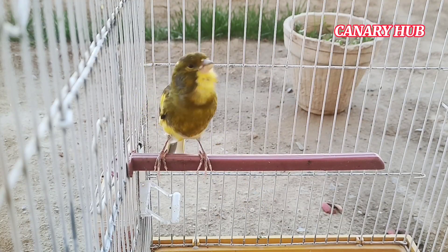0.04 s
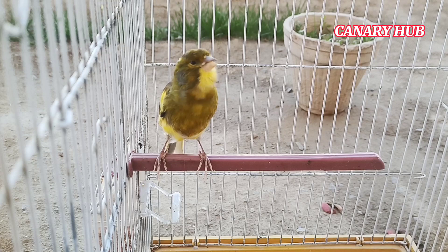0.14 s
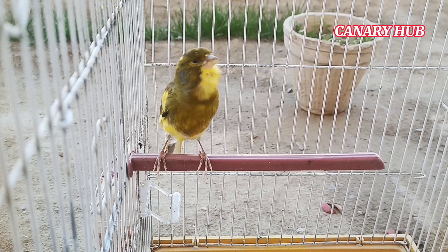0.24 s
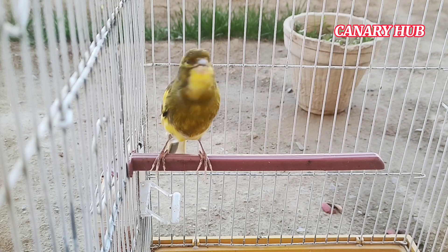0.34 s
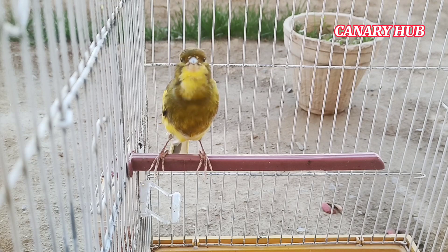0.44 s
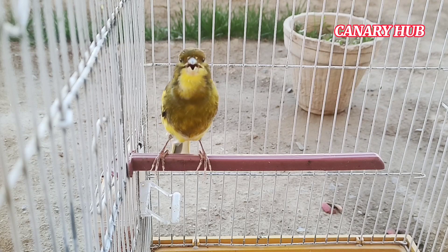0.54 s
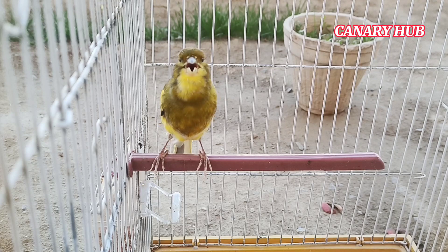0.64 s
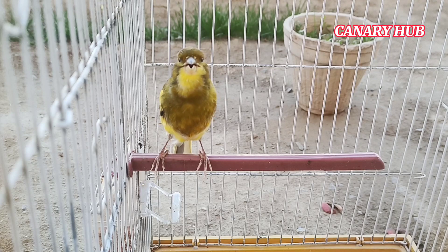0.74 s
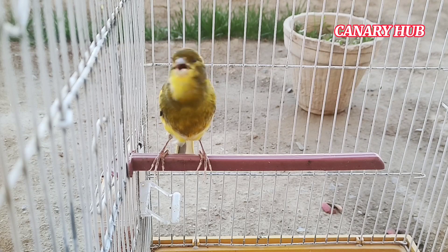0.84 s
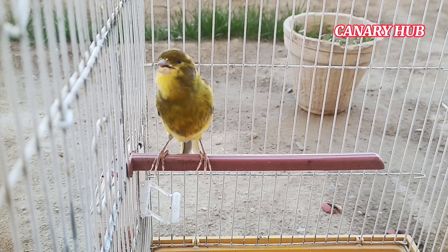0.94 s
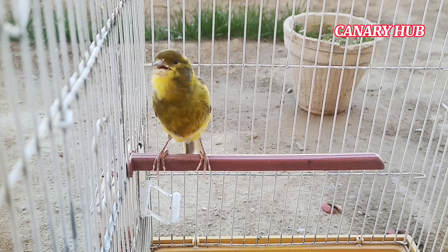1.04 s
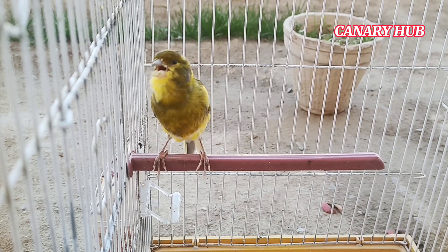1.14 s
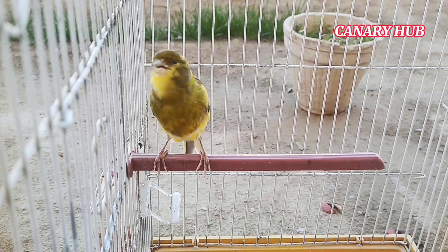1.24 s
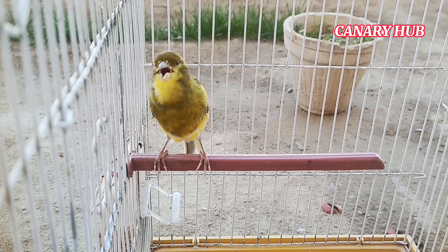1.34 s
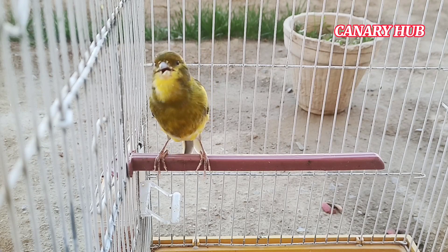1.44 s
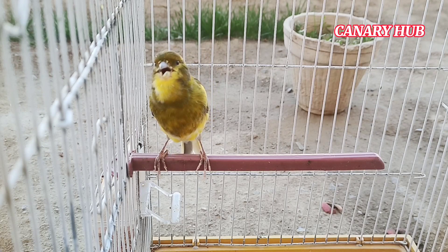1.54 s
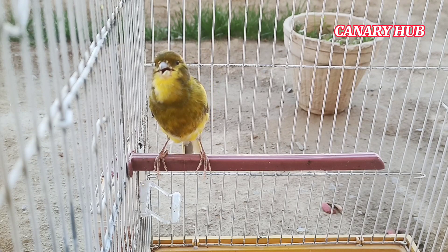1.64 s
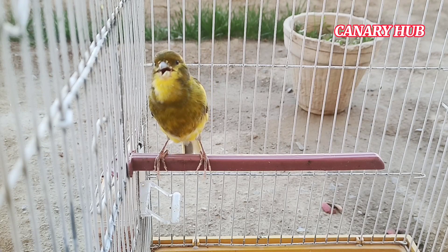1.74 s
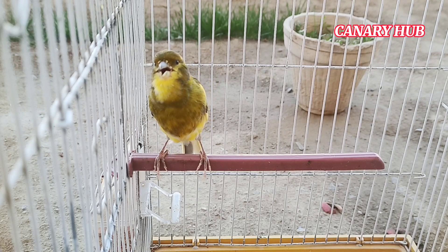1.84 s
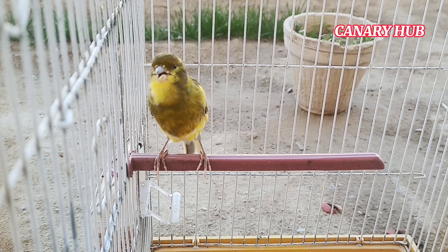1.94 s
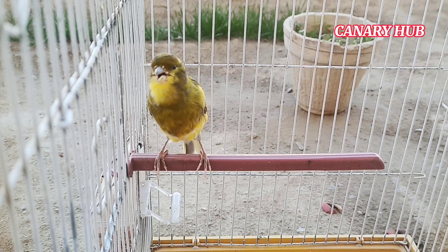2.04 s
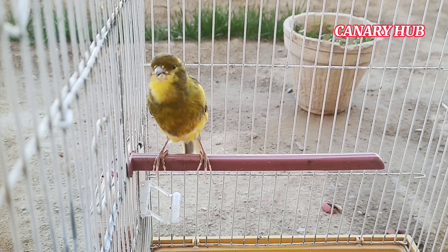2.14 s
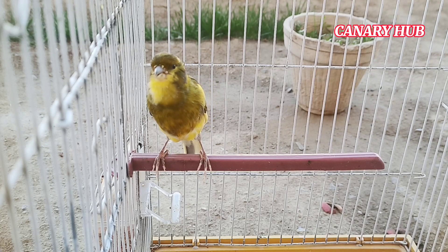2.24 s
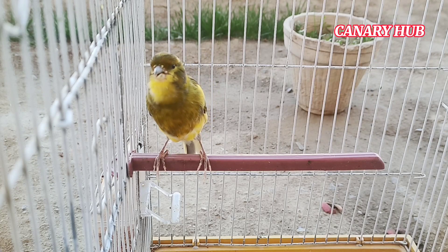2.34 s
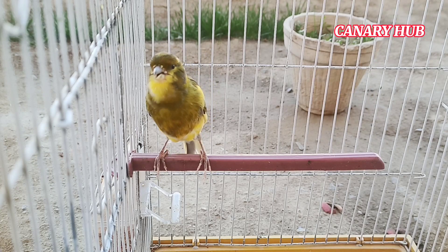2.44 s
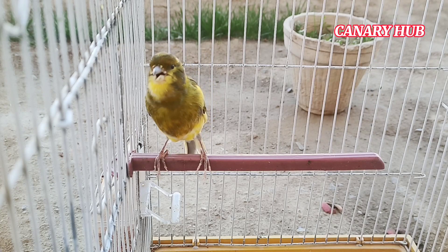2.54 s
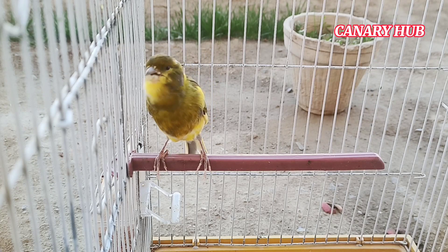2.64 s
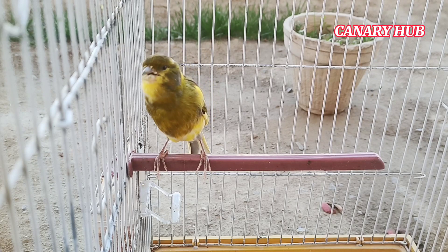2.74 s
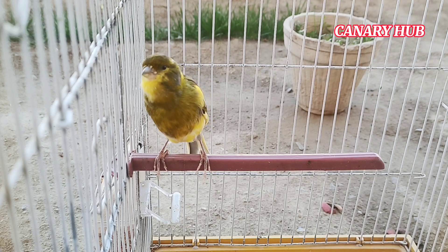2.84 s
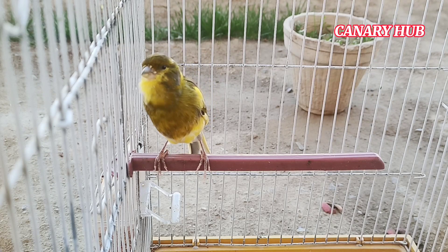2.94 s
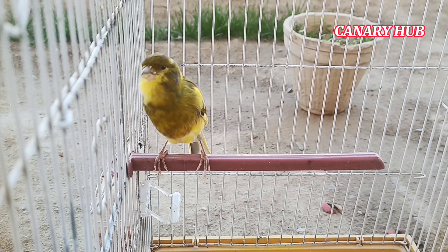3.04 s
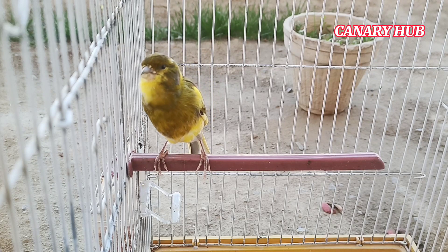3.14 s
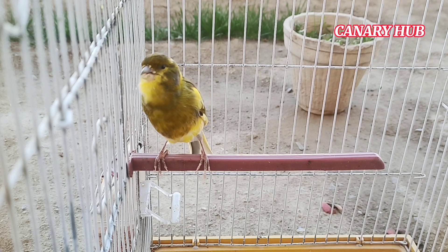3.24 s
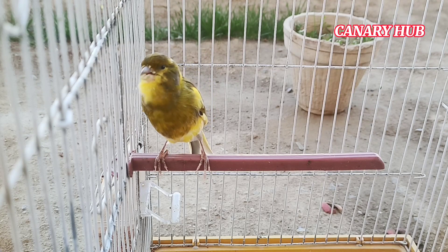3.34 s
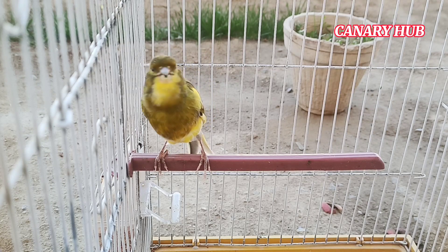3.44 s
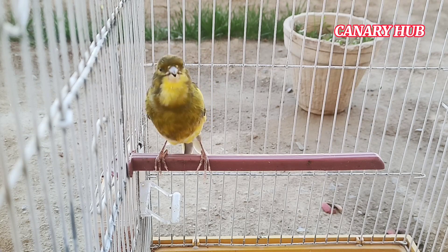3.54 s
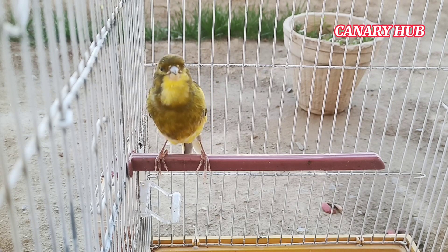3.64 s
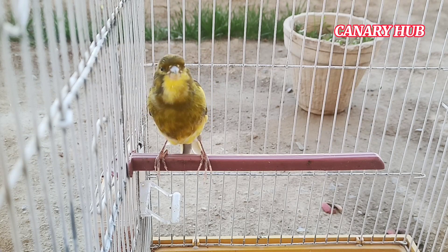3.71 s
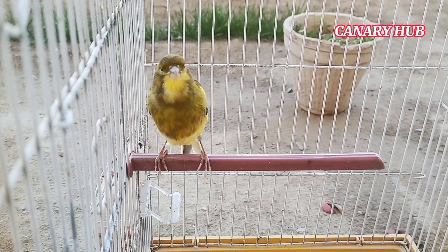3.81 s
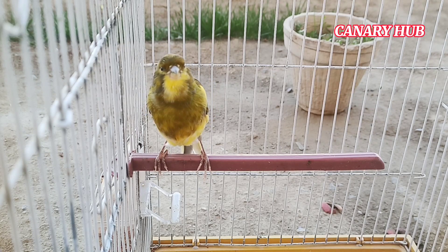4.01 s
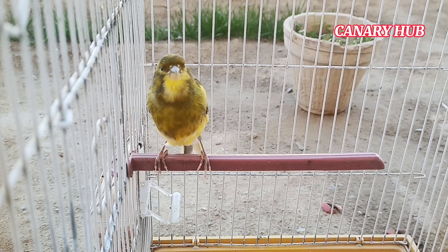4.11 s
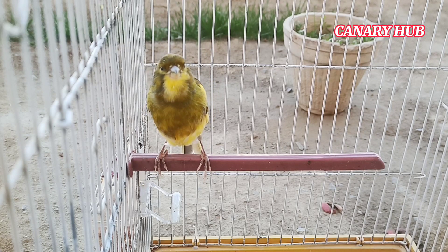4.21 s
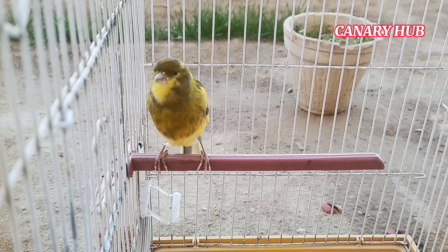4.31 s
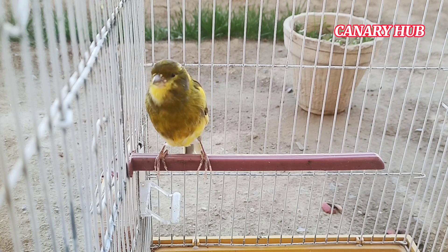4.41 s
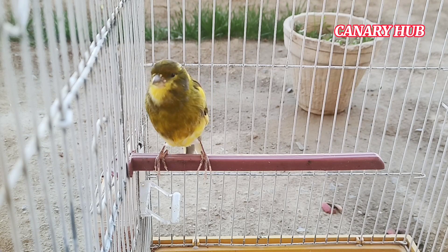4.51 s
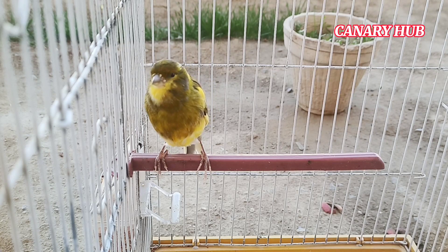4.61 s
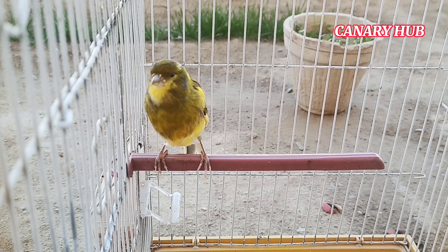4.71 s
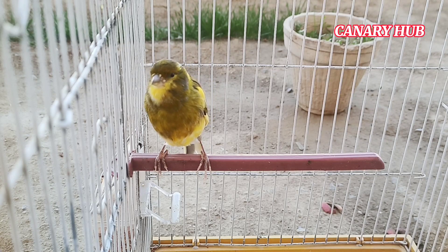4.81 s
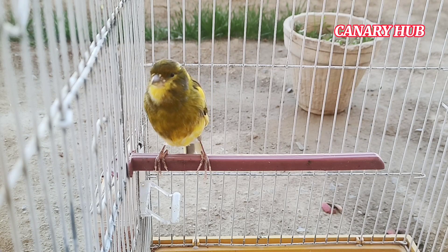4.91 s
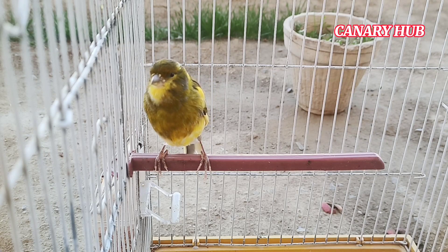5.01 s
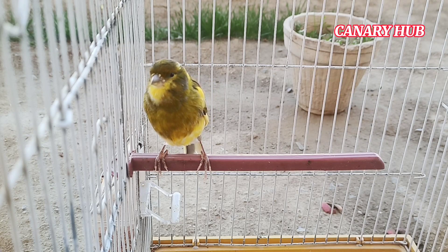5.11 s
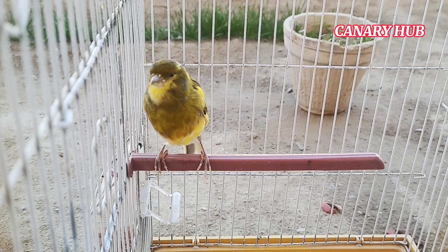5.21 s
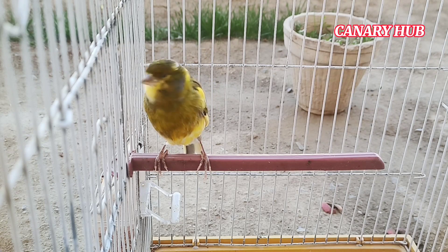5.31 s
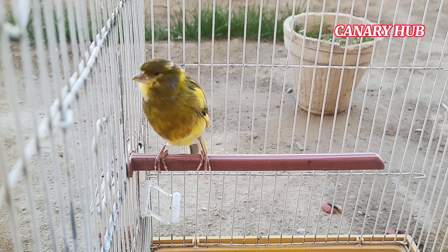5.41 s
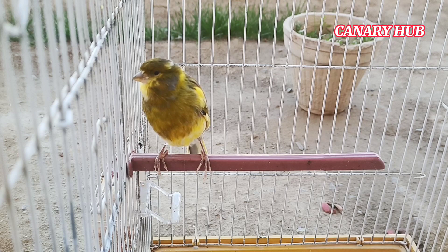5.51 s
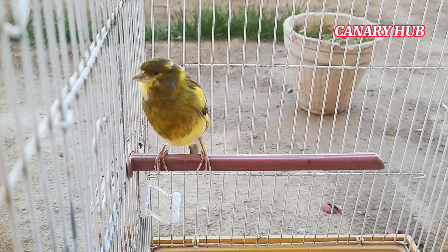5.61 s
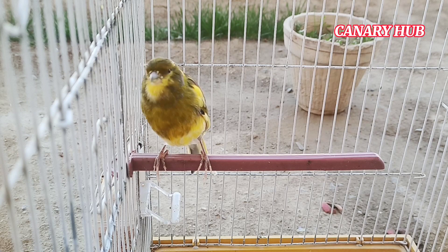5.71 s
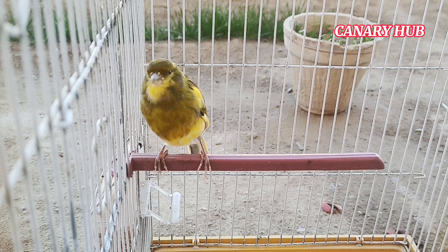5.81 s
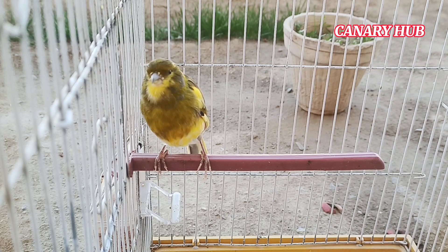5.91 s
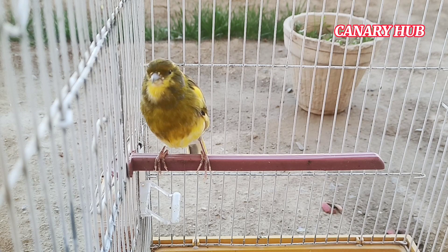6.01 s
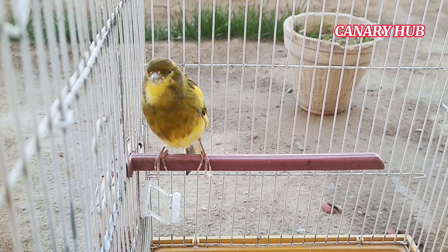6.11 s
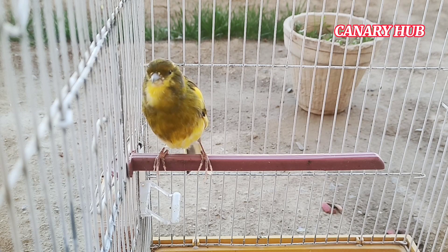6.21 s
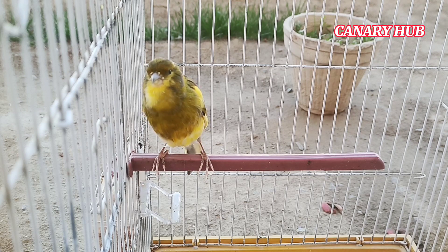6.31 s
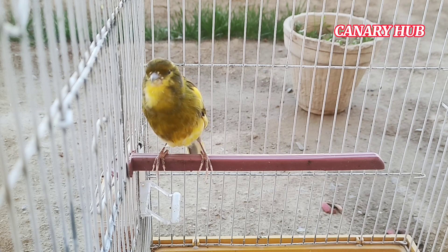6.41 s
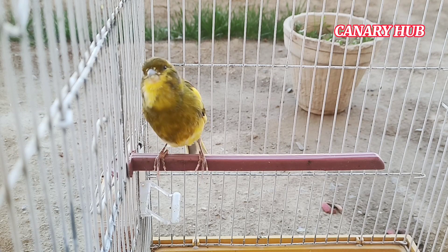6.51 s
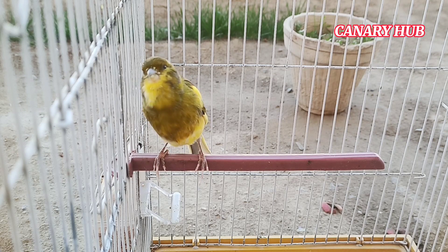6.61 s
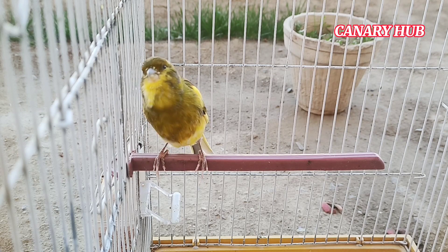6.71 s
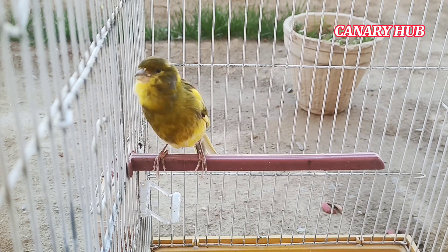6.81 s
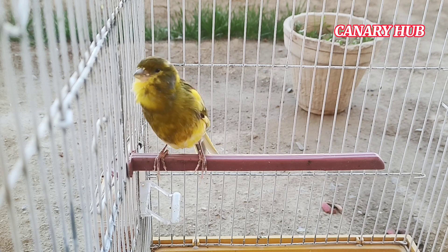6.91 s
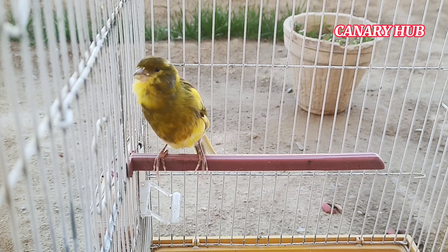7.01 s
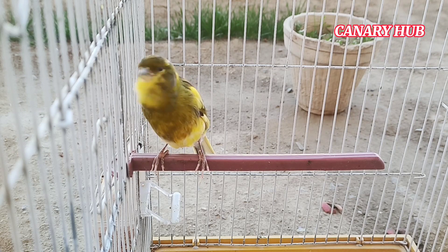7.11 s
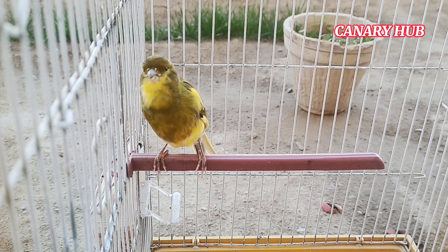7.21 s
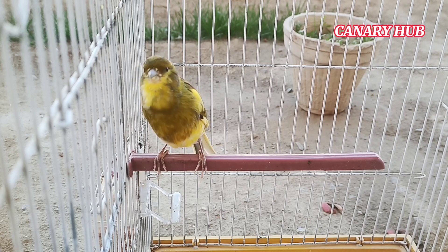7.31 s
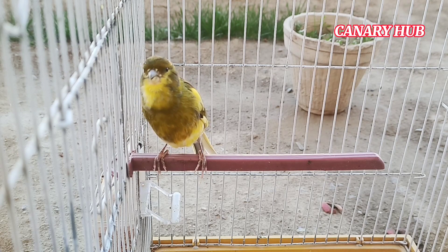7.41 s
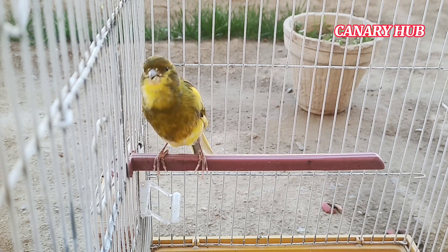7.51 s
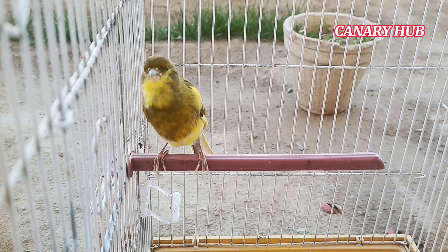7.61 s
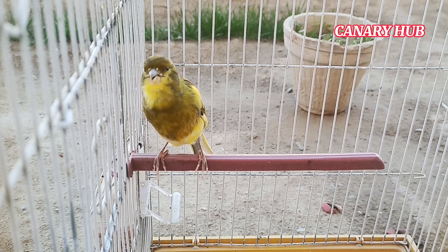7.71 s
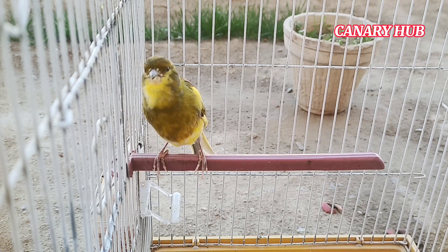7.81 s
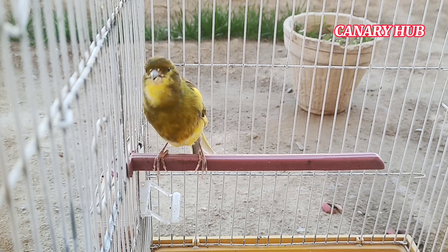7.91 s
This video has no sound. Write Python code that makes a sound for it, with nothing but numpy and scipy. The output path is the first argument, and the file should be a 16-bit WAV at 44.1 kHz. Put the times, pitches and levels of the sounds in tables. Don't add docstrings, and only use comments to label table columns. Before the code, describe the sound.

A caged canary sings loud rapid trills and falling whistles, pauses while a distant bird answers, then ends on a swelling bell-like trill over faint traffic.

```python
import sys
import numpy as np
from scipy import signal
from scipy.fft import rfft, irfft
from scipy.io import wavfile
from scipy.ndimage import uniform_filter1d

SR = 44100
rng = np.random.default_rng(int(sys.argv[2]) if len(sys.argv) > 2 else 0)


def invert_db(level):
    return 10 ** (np.asarray(level, dtype=float) / 20)


def persist_wave(psi):
    counts = np.round(np.clip(psi, -1, 1) * 32767).astype(np.int16)
    wavfile.write(sys.argv[1], SR, np.atleast_2d(counts).T)


N = 350595
TIME = np.arange(N) / SR
RUN_IN = 4410

# (time [s], level [dB])
TRAFFIC = [(0.0, -38), (.7, -41.5), (1.4, -44), (2.0, -37.5), (3.6, -37.5), (5.3, -36), (7.95, -37)]
# (frequency [Hz], level per Hz [dB])
YARD_COLOUR = [(15, -57.5), (25, -25), (42, -12), (84, 0), (145, -1.5), (175, -3), (335, -17.5), (545, -18),
               (796, -22.5), (962, -21), (1480, -24.5), (3520, -37.5), (6380, -41.5), (8140, -61.5),
               (16000, -68)]
# (frequency [Hz], width [Hz], level [dB])
ENGINES = [(98, 14, -11), (135.7, 22, -3.5), (232.6, 3.3, -13.5), (286.7, 40, -13.5), (342.3, 36, -17),
           (456.7, 40, -17)]
# (time [s], spread [s], level [dB])
CARS = [(0.05, 0.22, -53), (3.8, .6, -48.5), (6.2, 0.42, -55), (7.35, 0.45, -52.5)]
# (time [s], spread [s], level [dB])
FAR_CHIRPS = [(4.1, 0.19, -63), (5.6, 0.015, -59), (5.67, 0.0299, -57.5)]
# (frequency [Hz], level [dB])
MICROPHONE = [(1500, -5), (6800, 0.5), (7600, -9.5), (8500, -16), (12000, -17), (14000, -19.5), (15600, -3),
              (16500, -11)]
# (time [s], next note lifts it [s], depth [dB])
DUCKS = [(0.62, 0.651, -11), (0.835, 0.865, -8.5), (1.098, 1.126, -5.5), (1.357, 1.396, -3),
         (1.574, 1.641, -8.5), (2.235, 2.318, -13), (2.895, 3.083, -14), (3.831, 4.301, -11.5)]

CALL_SHAPE = [(0, 2943, -8.5), (.2, 3006, -5), (.45, 3060, 0), (.62, 3400, -7), (.8, 3370, -5),
              (.88, 3150, -1.5), (.95, 2700, -7), (1.03, 1900, -24)]
ARC_SHAPE = [(-.15, 2800, -19), (.15, 3900, -2), (.35, 4220, 4.5), (.6, 4200, 2), (.85, 3880, -9),
             (1.3, 3000, -28)]
PEEP_SHAPE = [(0, 4670, -7), (.3, 4630, -5.5), (1, 4560, -9)]
LAST_FALL_SHAPE = [(0, 4800, -18), (.2, 4330, -11.5), (.4, 3870, -8), (.55, 3800, 3.5), (.75, 3480, -4),
                   (1, 3200, -16.5)]
LEAD_SHAPE = [(0.0, 3600, -22), (0.09, 3850, 6.5), (0.18, 4480, 4.5), (0.28, 4700, -3.5), (0.47, 6400, -13),
              (0.58, 6830, -7), (0.68, 6910, -6), (0.83, 6900, 5), (1.0, 7480, -7.5)]
CLIMB_SHAPE = [(0, 2160, -24), (.083, 3092, -3.5), (.167, 3944, 2.5), (.27, 4540, -2.5), (.5, 5280, -10.5),
               (.65, 6050, -4), (.77, 6220, -2.5), (.93, 6426, -2.5), (1.03, 6920, -11.5)]
FLICK_SHAPE = [(0, 2044, -24.5), (.12, 2650, -18), (.3, 3620, -9.5), (.45, 3876, 3), (.62, 4554, 0),
               (.8, 5040, 1), (.92, 5100, -4), (1.0, 5430, -20.5), (1.08, 6050, -24)]
BELL_SHAPE = [(0, 2160, -28.5), (.2, 2797, -19), (.36, 3323, -16), (.46, 3642, -11.5), (.58, 3721, -4),
              (.75, 3835, 1), (.88, 3737, -0.5), (1.02, 3900, -17.5)]
END_SHAPE = [(0, 2750, -28), (.125, 3400, -17), (.25, 3540, -10), (.375, 3530, -1), (.5, 3420, -2),
             (.625, 3320, -1), (.75, 3290, -5), (.875, 3340, -11), (1, 3350, -20)]
# (share after the leap [0-1], pitch [Hz], level [dB])
HOOK_SNAP = [(0.005, 5854, -15), (0.035, 5150, 4.5), (.07, 4737, -0.5), (.11, 4450, -19.5)]
FALL_SWEEP = dict(from_hz=4800, to_hz=2876, bend=0.61, quiet_db=-12.5, attack=0.37, sag_db=-1.5, release=0.21, last_db=-10.5)
WHISTLE_SWEEP = dict(from_hz=7690, to_hz=4400, bend=4.12, quiet_db=-29.5, attack=0.48, sag_db=-1, release=0.14, last_db=-19.5, steady=0.091)
STEEP_WHISTLE_SWEEP = dict(from_hz=8350, to_hz=4156, bend=5.1, quiet_db=-35.5, attack=0.45, sag_db=5, release=.08, last_db=-20, steady=0.27)
HOOK_SWEEP = dict(from_hz=4000, to_hz=5391, bend=1.9, quiet_db=-1, attack=0.29, sag_db=-7.5, release=.02, last_db=0.5)

# (time [s], length [s], pitch factor [ratio], level [dB])
CALLS = [(4.698, .08, 0.99, -36)]
ARCS = [(4.819, 0.019, .93, -39), (4.892, .022, 1.01, -41), (4.96, 0.0232, .99, -38.5),
        (5.034, 0.019, 1.02, -39.5)]
PEEPS = [(6.175, .085, 1.0, -53), (7.5, .38, .92, -47)]
FALLS = [(-.096, .031, 1.4, -17), (-.032, 0.038, 0.95, -9.5), (0.0325, 0.034, 0.98, -10.5),
         (0.0973, 0.031, 0.99, -8.5), (0.159, 0.033, 1, -8.5), (0.223, .0346, .99, -9),
         (0.289, .0346, .985, -9.5), (0.354, 0.035, 0.98, -8.5), (0.417, 0.036, .98, -7.5),
         (.485, 0.032, .95, -8)]
LAST_FALLS = [(.553, .037, 1, -4.5)]
WHISTLES = [(0.631, 0.18, 1, -6.5), (0.867, 0.19, 0.99, -5.5), (1.131, 0.2, .975, -5),
            (1.397, .16, 1.011, -7)]
LEADS = [(2.295, .065, 1.0, -20)]
CLIMBS = [(2.379, 0.064, 1.01, -11.5), (2.464, 0.065, 0.99, -11), (2.551, .059, .97, -9),
          (2.634, .065, 0.98, -10), (2.72, .0603, .975, -9.5), (2.803, 0.06, 0.95, -11.5)]
ENDS = [(7.884, .06, .99, -7.5)]
# (time [s], length [s], leap [kHz], level [dB])
HOOKS = [(1.6427, 0.045, .3, -11.5), (1.718, .0425, 1.2, -10.5), (1.79, .042, 1.2, -9.5),
         (1.862, 0.046, .6, -9), (1.939, 0.044, .6, -10), (2.014, .043, .2, -8), (2.09, 0.045, 0.18, -11),
         (2.161, 0.046, .7, -12.5)]
# (time [s], pitch factor [ratio], level [dB])
FLICKS = [(3.082, .97, -16), (3.1292, 0.98, -11.5), (3.173, .99, -10.5), (3.219, .97, -10),
          (3.2684, 0.97, -9.5), (3.317, 0.96, -8.5), (3.366, 0.98, -10), (3.4148, 0.97, -9),
          (3.4639, 0.97, -8.5), (3.515, 0.97, -8.5), (3.5647, 0.99, -8.5), (3.616, 0.98, -8.5),
          (3.665, 0.96, -10), (3.717, .96, -11), (3.774, .96, -11.5)]
# (time [s], length [s], level [dB])
BELLS = [(6.215, 0.046, -22.5), (6.292, 0.039, -14), (6.367, 0.035, -10.5), (6.43, .043, -8),
         (6.5017, 0.04, -9), (6.571, 0.037, -7.5), (6.636, 0.043, -8.5), (6.707, 0.041, -5.5),
         (6.777, 0.04, -6.5), (6.844, 0.039, -5.5), (6.912, .041, -5.5), (6.9814, 0.041, -4.5),
         (7.047, 0.039, -7), (7.111, .0414, -4.5), (7.181, .039, -4), (7.245, .041, -5), (7.31, .044, -3.5),
         (7.381, 0.037, -2), (7.444, .04, -4), (7.5093, 0.036, -2.5), (7.574, 0.031, -2.5),
         (7.633, 0.035, -4), (7.695, 0.033, -4), (7.755, 0.034, -3.5), (7.819, 0.035, -3.5)]


def rms_one(x):
    return x / np.sqrt(np.mean(x ** 2) + 1e-20)


def wander(count, width):
    once = uniform_filter1d(rng.standard_normal(count), size=width)
    return rms_one(uniform_filter1d(once, size=width))


def coloured(x, points):
    hz, db = np.transpose(points)
    grid = np.maximum(np.fft.rfftfreq(len(x), 1 / SR), 1)
    return irfft(rfft(x) * invert_db(np.interp(np.log(grid), np.log(hz), db)), len(x))


def resonant_noise(hz, width_hz):
    r = np.exp(-np.pi * width_hz / SR)
    poles = [1, -2 * r * np.cos(2 * np.pi * hz / SR), r * r]
    once = signal.lfilter([1, 0, -1], poles, rng.standard_normal(N))
    return rms_one(signal.lfilter([1], poles, once))


def patchy(x):
    edges = 200 * 2 ** (np.arange(9) / 2)
    out = x.copy()
    for band in zip(edges, edges[1:]):
        swell = invert_db(2.5 * wander(N, SR // 6))
        out += (swell - 1) * signal.sosfiltfilt(signal.butter(1, band, "band", fs=SR, output="sos"), x)
    return out


def passing(events):
    return sum(invert_db(db) * np.exp(-((TIME - s) / spread) ** 2) for s, spread, db in events)


def traffic():
    noise = rms_one(patchy(coloured(rng.standard_normal(N), YARD_COLOUR)))
    low_pass = signal.butter(2, 1700, fs=SR, output="sos")
    rumble = signal.sosfiltfilt(low_pass, noise)
    air = noise - rumble
    for hz, width_hz, db in ENGINES:
        rumble = rumble + invert_db(db + 3.2 * wander(N, SR // 4)) * resonant_noise(hz, width_hz)
    rumble_db = np.interp(TIME, *np.transpose(TRAFFIC))
    air_db = -37 + 0.04 * (TIME - 3)
    tyres = (invert_db(-61) + passing(CARS)) * resonant_noise(798, 170)
    chirps = passing(FAR_CHIRPS) * resonant_noise(5200, 3000)
    return invert_db(rumble_db) * rms_one(rumble) + invert_db(air_db) * air + tyres + chirps


def walls(x, t60_s):
    t = np.arange(SR // 2) / SR
    tail = rng.standard_normal(len(t)) * invert_db(-60 * t / t60_s) * np.clip(t / 0.00047, 0, 1)
    return signal.fftconvolve(x, tail / np.sqrt(np.sum(tail ** 2)))[:len(x)]


def sweep(from_hz, to_hz, bend, quiet_db, attack, sag_db, release, last_db, steady=0):
    share = np.arange(41) / 40
    eased = (1 - np.exp(-bend * share)) / (1 - np.exp(-bend))
    hz = from_hz + (to_hz - from_hz) * ((1 - steady) * eased + steady * share)
    swell_db = quiet_db * np.clip(1 - share / attack, 0, 1) ** 1.67
    let_go_db = last_db * np.clip(1 - (1 - share) / max(release, .01), 0, 1)
    return np.transpose([share, hz, swell_db + sag_db * share ** 2 + let_go_db])


def hook(leap_khz):
    snap_share = 0.9
    leap = np.clip(0.082 * leap_khz + 0.018, .04, .4)
    rise = sweep(**HOOK_SWEEP) * [snap_share - leap, 1, 1]
    height_khz = 0.96 * leap_khz
    top_hz, top_db = rise[-1, 1] + 1000 * height_khz, rise[-1, 2] - 7 * height_khz
    top = [(snap_share - part * leap, top_hz, top_db) for part in (0.47, 0.18)]
    return np.vstack([rise, top, np.add(HOOK_SNAP, [snap_share, 0, 0])])


def phrase(shape, notes, overtones_db, echo, notch_hz, drift_hz=0, shy_db=0, bolder_db=0, rasp_db=-38,
           flutter_db=1.8, lead_share=0.3, lead_fade=.28, warming=0.57):
    out = np.zeros(RUN_IN + N)
    share, hz, level_db = np.transpose(shape)
    for (start, length, factor, db), along in zip(notes, np.linspace(0, 1, len(notes))):
        first = int((start - .008) * SR)
        last = min(int((start + length + 0.024) * SR), N)
        at = np.arange(first + RUN_IN, last + RUN_IN)
        t = (at - RUN_IN) / SR - start
        pitch = uniform_filter1d(factor * np.interp(t / length, share, hz), size=30)
        phase = 2 * np.pi * (np.cumsum(pitch) / SR + rng.random())
        inside_s = np.minimum(t - share[0] * length, share[-1] * length - t)
        edges = np.clip(inside_s / 0.002 + 0.43, 0, 1)
        lead_db = shy_db + bolder_db * along ** warming
        lead = np.clip(.5 + (lead_share - t / length) / lead_fade, 0, 1)
        effort_db = np.interp(t / length, share, level_db) + lead_db * lead
        unsteady = wander(SR // 2, SR // 300)[:len(t)]
        effort_db = uniform_filter1d(effort_db, size=40) + flutter_db * unsteady
        glide = np.abs(np.gradient(pitch))
        glide = glide / np.max(glide)
        rasp = invert_db(rasp_db) * (0.18 + 4.4 * glide) * rng.standard_normal(SR // 2)[:len(t)]
        lag = 1 / (notch_hz + drift_hz * along)
        for late, gain in ((0, 1), (lag, echo), (2 * lag, -0.36 * echo)):
            turn = np.interp(t - late, t, phase)
            push_db = np.interp(t - late, t, effort_db)
            tone = np.sin(turn) + rasp * (late == 0)
            for k, over_db in enumerate(overtones_db, start=2):
                strength = invert_db(over_db + 0.17 * push_db + 2.0 * unsteady[::-1])
                tone += strength * np.sin(k * turn) * (k * pitch < .4 * SR)
            out[at] += gain * invert_db(db + push_db) * np.interp(t - late, t, edges) * tone
    return out


def far_bird():
    call = phrase(CALL_SHAPE, CALLS, [4, -24], echo=0.2, notch_hz=402)
    arcs = phrase(ARC_SHAPE, ARCS, [-18, -30], echo=0.18, notch_hz=404)
    peeps = phrase(PEEP_SHAPE, PEEPS, [-30], echo=0.31, notch_hz=408, flutter_db=6)
    return call + arcs + peeps


def canary_whistles():
    gentle = phrase(sweep(**WHISTLE_SWEEP), WHISTLES[:3], [-30, -25, -50], echo=0.45, notch_hz=735,
                    drift_hz=3, rasp_db=-47, flutter_db=.55)
    steep = phrase(sweep(**STEEP_WHISTLE_SWEEP), WHISTLES[3:], [-30, -25, -50], echo=0.49, notch_hz=728,
                   rasp_db=-47, flutter_db=.55)
    return gentle + steep


def canary_trills():
    falls = phrase(sweep(**FALL_SWEEP), FALLS, [-34, -28, -40], echo=0.64, notch_hz=742.4,
                   drift_hz=-15.5, rasp_db=-43.5)
    falls += phrase(LAST_FALL_SHAPE, LAST_FALLS, [-36, -28, -40], echo=0.19, notch_hz=695)
    hooks = 0
    for s, length, leap_khz, db in HOOKS:
        hooks = hooks + phrase(hook(leap_khz), [(s, length, 1, db)], [-31, -30, -50], echo=0.43,
                               notch_hz=741.7, rasp_db=-36.5)
    climbs = phrase(LEAD_SHAPE, LEADS, [-36, -36, -50], echo=0.6, notch_hz=742)
    climbs += phrase(CLIMB_SHAPE, CLIMBS, [-34, -36, -40], echo=0.51, notch_hz=747, drift_hz=6.4, rasp_db=-36.5)
    flick_notes = [(s, .032, factor, db) for s, factor, db in FLICKS]
    flicks = phrase(FLICK_SHAPE, flick_notes, [-30, -32, -40], echo=0.48, notch_hz=743,
                    shy_db=-13.5, bolder_db=17, rasp_db=-40.0)
    bell_notes = [(s, length, 1 + 0.01 * k / len(BELLS), db) for k, (s, length, db) in enumerate(BELLS)]
    bells = phrase(BELL_SHAPE, bell_notes, [-32, -30, -30], echo=0.48, notch_hz=745.4, drift_hz=-14.5,
                   shy_db=-14, bolder_db=19.5, rasp_db=-42, flutter_db=.6,
                   lead_share=0.55, lead_fade=0.095, warming=0.59)
    end = phrase(END_SHAPE, ENDS, [-30, -30, -35], echo=0.22, notch_hz=729)
    return falls + hooks + climbs + flicks + bells + end


def ducking_db(recovery_s):
    gain_db = np.zeros(N)
    for start, lift, depth_db in DUCKS:
        active = (TIME > start) * (TIME < lift)
        gain_db += depth_db * np.exp(-np.maximum(TIME - start, 0) / recovery_s) * active
    return gain_db


def scene():
    trills, long_notes, far = canary_trills(), canary_whistles(), far_bird()
    tails = walls(invert_db(-17.0) * trills + invert_db(-16.5) * long_notes, 0.19)
    tails = coloured(tails, MICROPHONE)[RUN_IN:]
    slap = invert_db(-30.5) * np.roll(trills, int(.033 * SR))
    far_tail = invert_db(-1) * walls(far, 0.18)
    direct = coloured(trills + slap + long_notes + far + far_tail, MICROPHONE)[RUN_IN:]
    return (direct + tails * invert_db(0.23 * ducking_db(.3)) + traffic())[None]


def top_cut(x):
    return signal.sosfilt(signal.butter(12, 16950, fs=SR, output="sos"), x)


def record(dry):
    limit, release_db_s = .63, 144.5
    over_db = np.maximum(20 * np.log10(np.abs(dry[0]) / limit + 1e-9), 0)
    held_db = np.maximum.accumulate(over_db + release_db_s * TIME) - release_db_s * TIME
    gain_db = -np.roll(held_db, -30)
    gain_db += ducking_db(0.051)
    hiss = invert_db(-81.5) * resonant_noise(15300, 1500)
    mix = (dry + hiss) * invert_db(uniform_filter1d(gain_db, size=60))
    treble_cut = signal.cheby2(12, 50, 16100, fs=SR, output="sos")
    mix = signal.sosfilt(treble_cut, mix)
    return top_cut(mix)


dry = scene()
out = record(dry)
persist_wave(out)
```